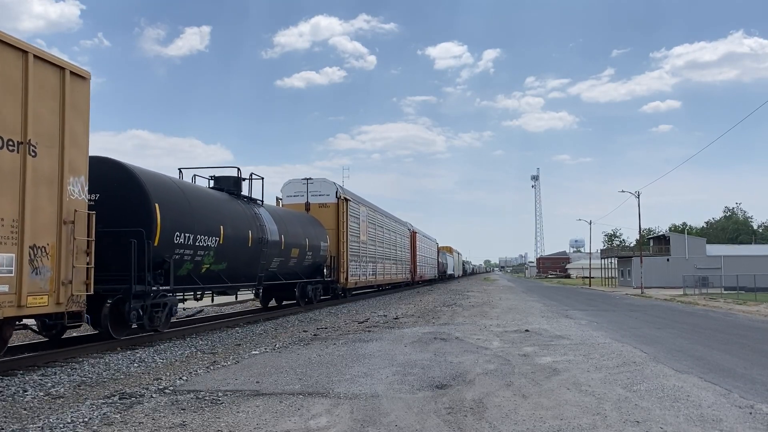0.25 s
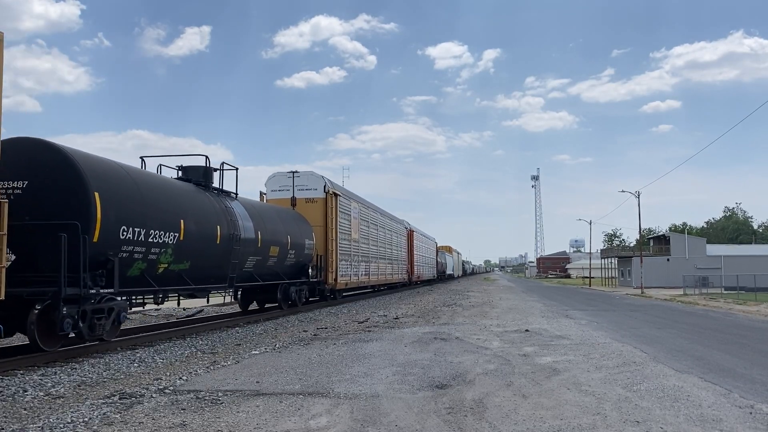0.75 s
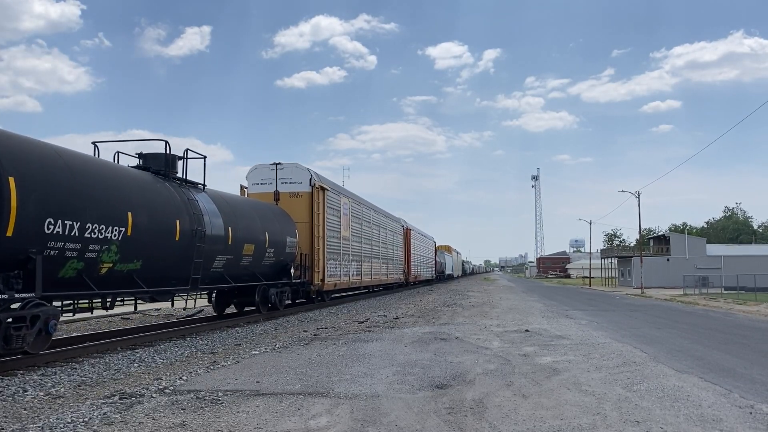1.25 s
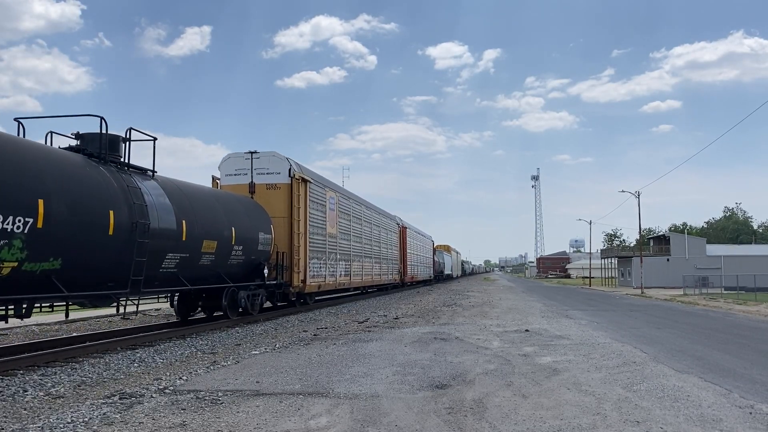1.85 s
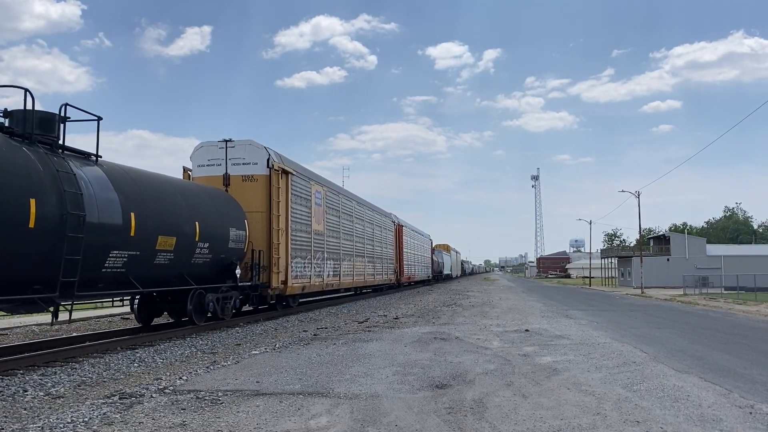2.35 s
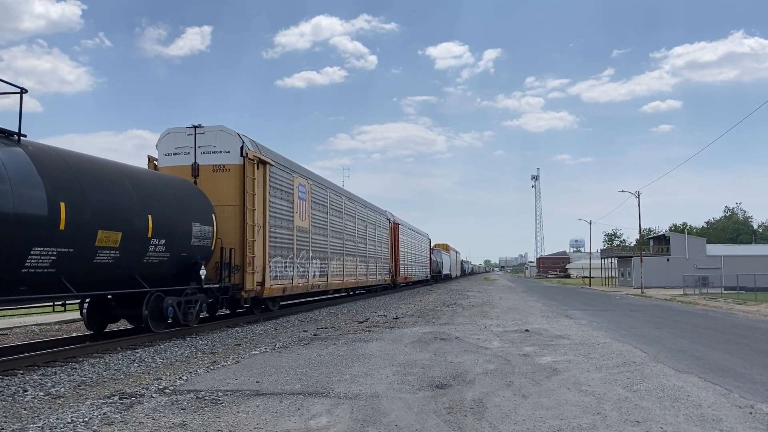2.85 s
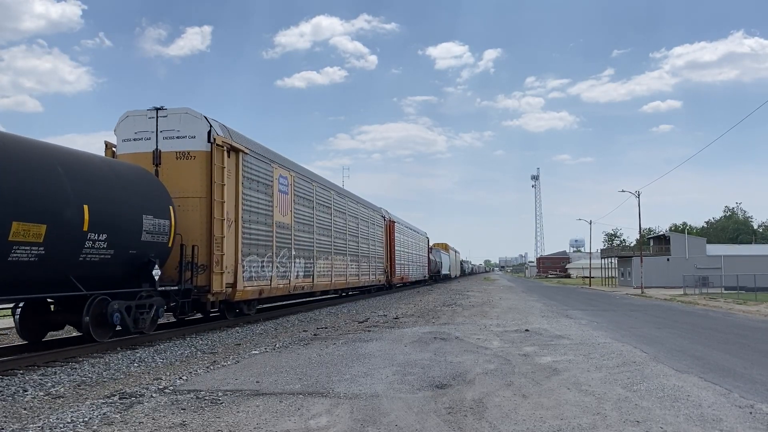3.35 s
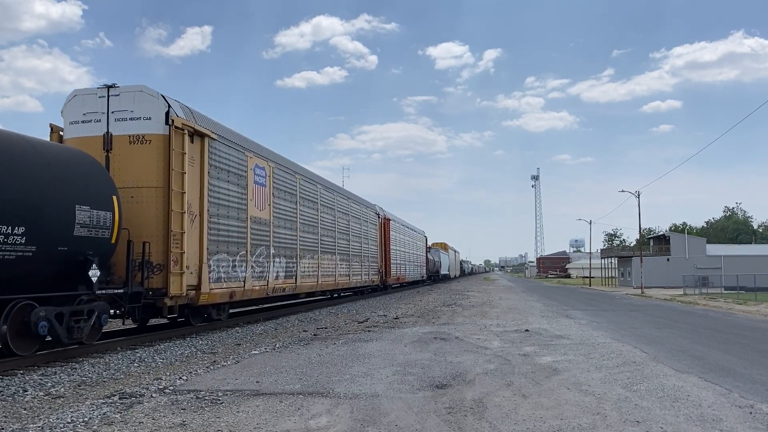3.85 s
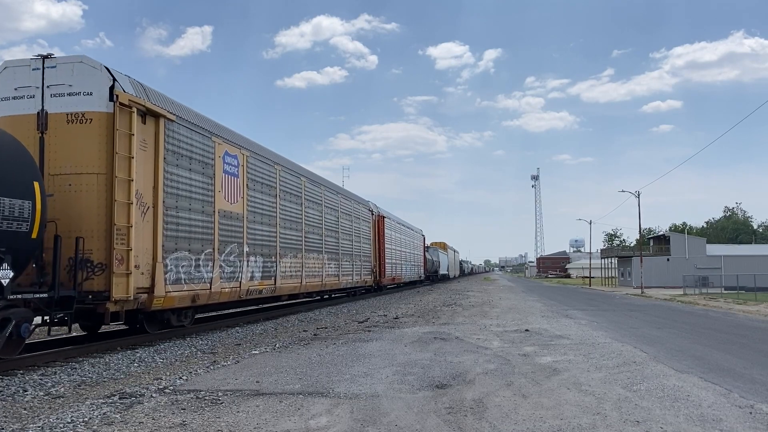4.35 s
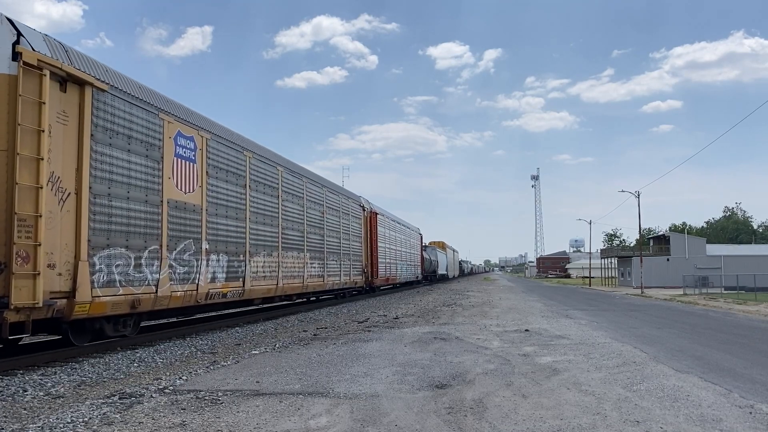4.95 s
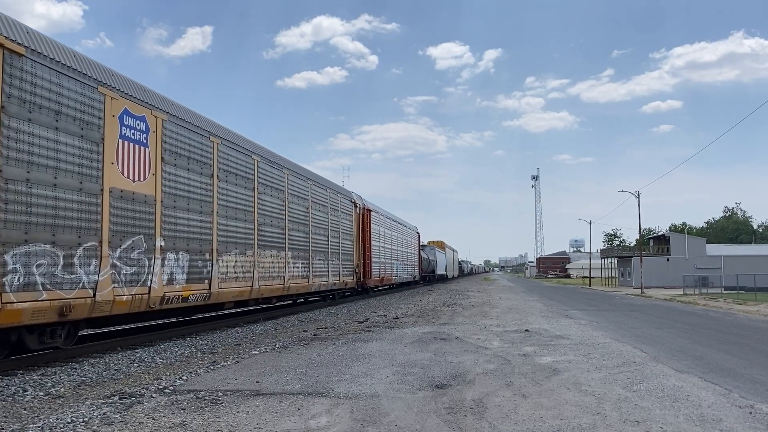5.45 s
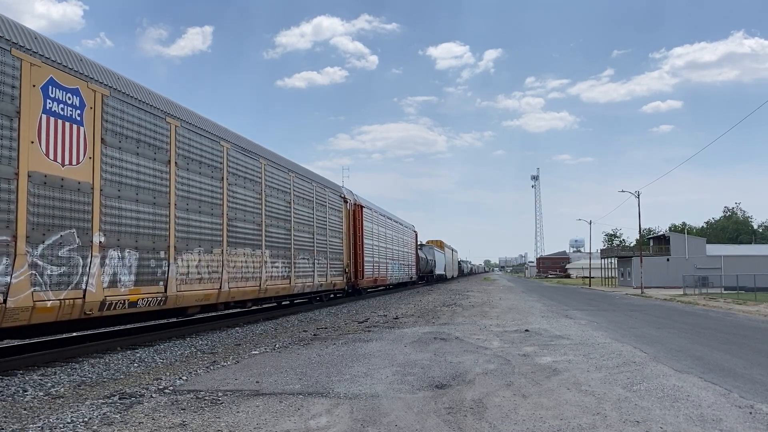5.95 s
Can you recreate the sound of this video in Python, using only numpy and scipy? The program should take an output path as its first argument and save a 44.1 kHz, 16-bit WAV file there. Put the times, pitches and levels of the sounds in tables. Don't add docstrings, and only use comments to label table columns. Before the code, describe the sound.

Outdoor trackside stereo from a handheld phone, unprotected from wind. Heavy cars heave with low rumble while wheels hiss, ring and clatter a few steps away. Loose steel ticks and rattles; flanges rub in bright bursts. After a tiny high ping comes a violent low gust thump, then stronger rubbing, a singing wheel truck, squeaks and several softer wind slaps. Each passing truck shifts the tone and side.

```python
import sys
import numpy as np
from scipy import signal
from scipy.fft import rfft, irfft, next_fast_len
from scipy.io import wavfile
from scipy.ndimage import uniform_filter1d

SR = 44100
rng = np.random.default_rng(int(sys.argv[2]) if len(sys.argv) > 2 else 0)


def gain_from_db(level_db):
    decades = np.asarray(level_db, float) / 20
    return 10 ** decades


def log_audio(samples):
    frames = np.atleast_2d(samples).T
    limited = np.clip(frames, -1, 1)
    pcm = np.round(limited * 32767).astype(np.int16)
    wavfile.write(sys.argv[1], SR, pcm)


N = 273420
M = next_fast_len(N)
T, HZ = np.arange(N) / SR, np.fft.rfftfreq(M, 1 / SR)
OCTAVE = np.log2(HZ + 1)
CONTROL = 32


def shape(table):
    hz, value = np.transpose(table)
    return np.interp(np.log(HZ + 1), np.log(hz + 1), value)


def curve(table):
    return np.interp(T, *np.transpose(table))


def fine(slow):
    return np.repeat(slow, CONTROL)[:N]


def bumps(table):
    t = T[::CONTROL]
    return fine(sum(db * np.exp(-((t - s) / half_s) ** 2) for s, db, half_s in table))


def unit(x):
    return x / np.sqrt(np.mean(x ** 2))


def walk(rate):
    k = int(SR / CONTROL / rate)
    held = np.repeat(rng.standard_normal(N // 200), k)[:N // CONTROL + 1]
    return unit(uniform_filter1d(uniform_filter1d(held, k), k))


def grains(spread_db, share):
    size_db = spread_db * np.minimum(rng.exponential(size=(2, M)), 4)
    clicks = rng.standard_normal((2, M)) * (rng.random((2, M)) < .03) * gain_from_db(size_db)
    return rfft(rng.standard_normal((2, M)) + share * unit(clicks))


def texture(table, drive, all_db, own_db, rate):
    spectrum, together, out = drive * gain_from_db(shape(table)), walk(rate), 0
    for centre in np.arange(np.log2(table[0][0]), np.log2(table[-1][0]), .5):
        band = np.cos(np.pi * np.clip(OCTAVE - centre, -.5, .5)) ** 2
        flutter_db = all_db * together + own_db * walk(rate * 1.5)
        out = out + irfft(spectrum * band, M)[:, :N] * fine(gain_from_db(flutter_db))
    return unit(out)


def ring(drive, hz, width):
    return unit(irfft(drive / (1 + ((HZ - hz) / width * 2) ** 2), M)[..., :N])


def burst(t0, rise, t60, clock=T):
    t = np.clip(clock - t0, 0, None)
    return (1 - np.exp(-t / rise)) * np.exp(-np.log(1000) * t / t60)


def swells(table):
    out = np.zeros((2, N))
    for t0, db, hz, half_s in table:
        i = slice(max(int((t0 - 3 * half_s) * SR), 0), int((t0 + 3 * half_s) * SR))
        turn = 2 * np.pi * hz * (T[i] - t0)
        swell = gain_from_db(db) * np.exp(-((T[i] - t0) / half_s) ** 2)
        out[:, i] += swell * np.array([np.cos(turn), 0.36 * np.sin(turn)])
    return out


def rumble():
    # start_s, level_db
    weight = [(0, -17.5), (.4, -21.5), (1, -20.5), (1.6, -21.5), (2.4, -23), (2.95, -18), (3.3, -17),
              (3.6, -24.5), (4, -19.5), (4.6, -18.5), (5.2, -18.5), (5.6, -17.5), (6.2, -20.5)]
    # centre_s, change_db, half_length_s
    heaves = [(.03, 6, 0.019), (.41, -7, 0.022), (.53, 2.5, 0.048), (1.93, 8.5, 0.087), (2.05, -1, .03),
              (2.87, 3.5, 0.024), (3.03, 7, 0.02), (2.31, -14, 0.026), (2.37, 3, .03), (2.52, -4, .04),
              (2.97, 11.5, 0.048), (3.12, -6.5, 0.12), (3.26, -1, 0.038), (3.49, 0, 0.022),
              (3.95, 3.5, 0.059), (4.02, -18, 0.025), (4.09, 4.5, 0.024), (4.21, 4, 0.018),
              (4.38, -0.5, 0.044), (4.44, -6, 0.027), (4.66, 0, 0.045), (4.8, 2, 0.02), (4.9, -4, 0.043),
              (5.2, 5.5, 0.099), (5.46, 4.5, 0.024), (5.58, -11, 0.037), (5.87, -6, 0.033)]
    # frequency_hz, density_db
    spectrum = [(20, -15), (32, -29), (45, -7.5), (62, -0.5), (85, 0.5), (115, -5.5), (160, -11.5),
                (300, -44)]
    # centre_s, peak_db, pitch_hz, half_length_s
    surges = [(0.053, -12, 84, 0.0093), (0.14, -17, 78.6, 0.01), (0.523, -15.5, 84, 0.019),
              (0.633, -14.5, 79.5, 0.014), (0.715, -12.5, 80.5, 0.015), (0.849, -12.5, 76, 0.011),
              (0.912, -17.5, 74.4, 0.015), (1.002, -15, 89, 0.019), (1.215, -15, 77, 0.0076),
              (1.447, -9, 82, 0.007), (1.876, -15, 79, 0.013), (1.927, -11, 70.4, 0.021),
              (2.11, -18, 74, 0.018), (2.239, -13, 77, 0.0073), (2.36, -11, 86, 0.014),
              (2.569, -12.5, 91, 0.014), (2.618, -10, 84, 0.0093), (2.693, -10.5, 77, 0.015),
              (2.777, -16, 92, 0.02), (2.914, -6.5, 91, 0.012), (2.988, -13, 89, 0.0096),
              (3.032, -9, 68.6, 0.019), (3.094, -10, 89, 0.0094), (3.249, -12.5, 79, 0.01),
              (3.334, -12, 85, 0.0074), (3.489, -17, 84, 0.019), (3.935, -10, 81, 0.028),
              (4.086, -12.5, 85, 0.019), (4.147, -9, 86, 0.0069), (4.225, -11, 82.4, 0.027),
              (4.317, -12.5, 88, 0.018), (4.403, -10, 79, 0.007), (4.54, -14.5, 83, 0.026),
              (4.596, -13, 78.5, 0.013), (4.659, -15, 84.5, 0.03), (4.732, -11.5, 91, 0.022),
              (4.809, -4, 99, 0.013), (5.001, -11.5, 90, 0.017), (5.073, -7, 82.6, 0.019),
              (5.131, -8.3, 85, 0.016), (5.205, -6, 78, 0.011), (5.257, -9.5, 77, 0.014),
              (5.464, -9, 85.5, 0.013), (5.57, -9, 78.4, 0.0074), (5.641, -13, 80, 0.012),
              (5.756, -8, 77, 0.0077), (5.917, -9, 80, 0.0059), (5.965, -17.5, 78, 0.012),
              (6.025, -15, 72, 0.015), (6.143, -11.5, 89, 0.011)]
    level_db = curve(weight) + 0.66 * bumps(heaves) - 1
    return gain_from_db(level_db) * texture(spectrum, grains(4.2, 0.41), 0.92, 0.26, 7) + swells(surges)


def wheels():
    # start_s, level_db
    flange = [(0, -52), (.53, -52), (.62, -44.5), (1.0, -36.5), (1.44, -37.5), (1.5, -44.5), (1.72, -54),
              (2.0, -45.5), (2.35, -54), (2.75, -45.5), (3.4, -52), (3.72, -47), (3.8, -36), (4.45, -37),
              (4.95, -39.5), (5.56, -42.5), (5.72, -48.5), (6.2, -53)]
    # centre_s, change_db, half_length_s
    scrapes = [(.08, 4, 0.016), (.38, 7.5, 0.018), (1.24, -2, 0.018), (1.6, 0.5, 0.015), (1.79, 3.5, .03),
               (1.97, 2.5, 0.019), (2.15, 3, 0.02), (2.47, 6.5, 0.029), (2.68, 3, 0.018),
               (2.98, -3.5, 0.074), (3.13, 3, 0.077), (3.28, 3, 0.077), (3.66, -1, .02), (3.82, 0.5, 0.028),
               (4.03, -4.5, 0.047), (4.14, 2.5, 0.012), (4.37, 3, 0.024), (4.99, -5.5, 0.032),
               (5.2, 2, 0.1), (5.37, -7, 0.0098), (5.82, 5.5, 0.015), (5.9, 5.5, 0.019), (6.17, -2, 0.018)]
    flange_db, scrape_db = curve(flange), bumps(scrapes)
    press_db = flange_db + 50
    rough = grains(3.6, 0.63)
    out = rolling(rough, press_db, scrape_db) + car_sides(rough, press_db)
    return out + rubbing(flange_db + scrape_db)


def rolling(rough, press_db, scrape_db):
    # start_s, level_db
    tread = [(0, 2), (.5, 2.5), (1.1, -2.5), (1.5, -0.5), (2.4, -3), (3.5, 0.5), (4.1, 1), (4.45, 8),
             (4.8, 1), (5.25, 5.5), (5.6, -2), (6.2, -1)]
    # frequency_hz, density_db
    spectrum = [(1100, -11), (1600, 1.5), (2000, -1), (2500, 2), (3100, -3), (4500, -8.5), (7000, -24.5)]
    # pitch_hz, width_hz, level_db
    modes = [(1040, 11, 4), (1348, 40, 7.5), (1760, 4.9, 5), (1925, 63, 7.5), (2250, 30, 3.5),
             (2586, 22, 3.5)]
    roll = texture(spectrum, rough, 0.55, 2.9, 8.2)
    for hz, width, db in modes:
        roll += ring(rough, hz, width) * fine(gain_from_db(db - 27 + 2 * walk(13)))
    return gain_from_db(-43.5 + 0.31 * press_db + 0.28 * scrape_db + curve(tread)) * roll


def car_sides(rough, press_db):
    # centre_s, change_db, half_length_s
    knocks = [(.33, -4, 0.024), (.45, 3, 0.028), (1.43, 9.5, 0.0065), (1.59, -2, 0.027), (1.67, -3, 0.027),
              (1.83, 12, 0.027), (1.97, 5, 0.07), (2.07, 4.5, 0.034), (2.48, 4, .02), (2.957, 7, .005),
              (3.0, 8.5, 0.05), (3.045, 9, 0.008), (3.32, -6, 0.055), (3.76, -12, 0.024), (3.9, 4, 0.085),
              (4.14, 8, 0.015), (4.755, -3, 0.0062), (4.93, -5, .05), (5.12, 3, .02), (5.4, -3, .03),
              (5.9, 5, 0.018)]
    # frequency_hz, density_db
    spectrum = [(450, -53), (700, 0.5), (1000, 4), (1350, -3), (1900, -20.5)]
    drum = texture(spectrum, rough, 0.55, 0.8, 12)
    return gain_from_db(-43.5 + 0.41 * press_db + bumps(knocks)) * drum


def rubbing(rub_db):
    # frequency_hz, density_db
    spectrum = [(1200, -2.5), (2200, -3), (3300, -0.5), (3750, -0.5), (4200, -1), (5500, -4), (7000, -5.5),
                (8800, -8.5), (12000, -16), (14000, -19.5), (15000, -26), (15250, -110)]
    # start_s, peak_db, t60_s
    clacks = [(0.0543, -43, 0.15), (0.1166, -48, 0.22), (0.251, -35.5, 0.084), (0.3456, -42, 0.12),
              (0.4723, -56, 0.085), (1.2755, -30, 0.046), (1.4137, -33.5, 0.12), (1.6028, -34, 0.057),
              (1.6921, -36.5, 0.072), (1.8582, -39, 0.041), (1.937, -44, 0.14), (2.2358, -49, 0.12),
              (3.217, -30.5, 0.047), (3.268, -42.5, 0.43), (3.7135, -35, 0.066), (4.063, -23, 0.037),
              (5.018, -44, 0.13), (5.7853, -34.5, 0.08), (5.8656, -37, 0.088), (5.966, -34, 0.085),
              (6.155, -36, 0.095)]
    rub = texture(spectrum, grains(3.4, 0.35), 1.34, 0.87, 11) + rattles()
    clack = fine(sum(gain_from_db(db + 0.5) * burst(t0, .003, t60, T[::CONTROL]) for t0, db, t60 in clacks))
    return (gain_from_db(rub_db + 4.5) + clack) * rub


def rattles():
    out, t = np.zeros(N), T[:5000]
    for when, pitch, size, life in rng.random((700, 4)):
        i, hz = int(when * (N - len(t))), 1200 * 7 ** pitch
        fall = burst(0, .004, .08 + .14 * life, t)
        out[i:i + len(t)] += gain_from_db(-7.5 - 6 * pitch + 6 * size) * fall * np.sin(2 * np.pi * hz * t)
    return np.array([out, 0 * out])


def gliding_bands():
    # start_s, length_s, from_hz, to_hz, level_db
    glides = [(.5, 0.75, 2500, 1700, -43), (5, 0.29, 2200, 2000, -49), (4.5, 0.38, 2750, 2400, -39.5),
              (0.3, .5, 2350, 2250, -46)]
    width_hz = 170
    grain = ring(grains(3.1, 0.45), 1, width_hz) * fine(gain_from_db(2 * walk(14)))
    out = 0
    for t0, length, start_hz, end_hz, db in glides:
        gone = np.clip((T - t0) / length, 0, 1)
        turns = np.cumsum(start_hz + (end_hz - start_hz) * gone) / SR
        out = out + gain_from_db(db) * np.sqrt(np.sin(np.pi * gone).clip(0)) * np.sin(2 * np.pi * turns)
    return grain * out


def squeaks():
    # start_s, length_s, pitch_hz, level_db, left_lead_rad
    cries = [(0.49, 0.038, 1856, -38.5, 1.1), (0.99, 0.058, 1303, -40, 1.1), (1.2, 0.27, 1257, -45, 1.2),
             (1.808, 0.025, 1335, -31.5, 1.5), (1.955, 0.038, 1300, -33, 1.1), (2.75, 0.18, 1314, -48, 1.5),
             (2.893, 0.083, 1720, -31.5, 1.8), (2.96, .04, 1720, -38, 1.9), (3.17, 0.05, 2730, -41, 0.91),
             (3.217, 0.24, 1297, -45, 0.92), (1.345, 0.058, 3390, -37, 1.2), (3.84, 0.18, 1860, -39.5, 1.1),
             (4.266, 0.024, 686, -31, 2), (4.695, 0.5, 3662, -49, 0.3), (5.843, 0.28, 1660, -46.5, 2.2),
             (.89, 0.075, 1956, -39.5, 1.2), (.97, .09, 1960, -38, 1.2), (1.0, .06, 1690, -41, 1.2),
             (0.334, 0.076, 2250, -50, .8), (1.27, 0.061, 1760, -42, 1.2), (4.354, .1, 2205, -37.5, .1),
             (4.593, .08, 2520, -35.5, .3), (5.2, 0.13, 1864, -38, 1.2)]
    out, waver = np.zeros((2, N)), np.cumsum(1 + 0.0052 * fine(walk(60))) / SR
    sides = gain_from_db([[3], [-3]])
    for t0, length, hz, db, lead in cries:
        i = slice(int(t0 * SR), int((t0 + length) * SR))
        swell = fine(gain_from_db(db + 4 * walk(60)))[i] * np.sin(np.pi * (T[i] - t0) / length)
        out[:, i] += swell * np.sin(2 * np.pi * hz * waver[i] - np.array([[0], [lead]])) * sides
    return out


def loose_rings():
    # centre_s, pitch_hz, peak_db
    tones = [(0.372, 4371, -47), (0.372, 4860, -55.7), (0.372, 5577, -53), (0.627, 5340, -54.9),
             (0.697, 5100, -43), (1.603, 4450, -48), (1.95, 3870, -48), (1.95, 5900, -53),
             (2.252, 3252, -50.5), (2.461, 3940, -53.9), (2.461, 5233, -59.8), (2.694, 2390, -45),
             (2.694, 4250, -56), (2.763, 1970, -46), (2.879, 3820, -51.5), (3.088, 3450, -48),
             (3.297, 4350, -57), (3.785, 3900, -50.9), (3.808, 2180, -41.5), (3.808, 2440, -41.5),
             (3.854, 5540, -40.5), (3.878, 4673, -43), (4.203, 2330, -38), (4.737, 4020, -38),
             (5.828, 2230, -45), (5.828, 3639, -46), (5.898, 5340, -53), (5.968, 3660, -51.7),
             (5.992, 3900, -45), (6.153, 5254, -50.0)]
    half_s = 0.022
    return swells([(s, db + 4, hz, half_s) for s, hz, db in tones])


def ping():
    # pitch_hz, width_hz, level_db, t60_s
    modes = [(12950, 600, -48, 0.7), (7600, 300, -54, 0.68), (10300, 900, -48, .08), (14300, 400, -56, .3),
             (15300, 600, -61, .45), (13000, 8000, -35, .012)]
    start_s, rise_s = 2.236, .0004
    shiver, out = rfft(rng.standard_normal(M)), 0
    for hz, width, db, t60 in modes:
        out = out + gain_from_db(db) * burst(start_s, rise_s, t60) * ring(shiver, hz, width)
    return np.array([out, 0 * out])


def slaps():
    # start_s, peak_db, thump_hz, t60_s
    gusts = [(2.867, -11, 187, 0.052), (2.956, 1, 182, 0.12), (3.02, -8.5, 171, 0.23),
             (3.04, -6.5, 263, 0.055), (3.239, -11, 198, 0.062), (4.713, -15, 196, 0.086),
             (4.75, -5.5, 281, 0.069), (5.445, -1.5, 208, 0.085), (5.646, -4.5, 201, 0.052),
             (4.8, -5, 170, 0.066), (5.012, -9.5, 191, .08)]
    rise_s, sink_s, start_pitch = .003, .012, 2.05
    band = signal.butter(3, [250, 520], "band", fs=SR, output="sos")
    air = signal.sosfilt(band, rng.standard_normal((2, N)))
    air = air[0] + 0.15 * air[1] * np.array([[1], [-1]])
    out = np.zeros((2, N))
    for t0, db, hz, t60 in gusts:
        i = slice(int(t0 * SR), int((t0 + 0.16) * SR))
        turns = hz * sink_s * np.log1p((T[i] - t0) / sink_s) * start_pitch
        thump = np.sin(2 * np.pi * turns) * burst(t0, rise_s, t60, T[i])
        puff = gain_from_db(-10) * (hz / 200) ** 2 * unit(air[:, i]) * burst(t0, 0.0033, 0.96 * t60, T[i])
        out[:, i] += gain_from_db(db - 6) * (thump + puff)
    return out


def wind():
    # start_s, strength_db
    strength = [(0, -26.5), (.9, -27), (1.05, -23), (1.3, -26.5), (1.7, -27.5), (2.3, -28), (2.45, -28),
                (2.6, -25), (2.93, -25.5), (2.96, -11), (3.045, -19), (3.06, -25), (3.32, -27), (3.57, -29),
                (3.85, -26), (4.7, -24.5), (5.5, -26), (6.2, -26.5)]
    # frequency_hz, density_db
    spectrum = [(80, -25), (130, -2.5), (200, -2.5), (300, -7.5), (450, -10.5), (650, -16.5), (950, -27.5),
                (1500, -57)]
    # centre_s, peak_db, pitch_hz, half_length_s
    eddies = [(0.079, -17, 176, 0.0091), (0.562, -15.5, 190, 0.0055), (0.816, -23, 184, 0.0074),
              (1.042, -14, 181, 0.01), (1.095, -20, 203, 0.008), (1.178, -16, 209, 0.014),
              (1.295, -23, 216, 0.0094), (1.408, -22, 157, 0.013), (1.518, -23, 197, 0.0053),
              (1.574, -17.5, 191, 0.011), (1.698, -29, 194, 0.008), (1.796, -20, 178, 0.0072),
              (1.863, -15.5, 204, 0.0084), (2.06, -19, 222, 0.0092), (2.259, -19, 178, 0.0066),
              (2.592, -19.5, 202, 0.0074), (2.83, -17.5, 215, 0.0092), (2.874, -15, 199, 0.0091),
              (2.974, -4, 184, 0.0079), (3.025, -7.5, 171, 0.0075), (3.118, -17.5, 193, 0.018),
              (3.244, -17, 197, 0.012), (3.289, -15, 202, 0.012), (3.327, -13.5, 168, 0.022),
              (3.525, -20, 177, 0.016), (3.816, -16, 180, 0.0091), (3.874, -13.5, 176, 0.012),
              (3.988, -18.5, 180, 0.023), (4.089, -18, 169, 0.008), (4.21, -10.5, 172, 0.0082),
              (4.372, -20, 187, 0.0067), (4.571, -16.5, 155, 0.014), (4.62, -9, 153, 0.011),
              (4.72, -18.5, 191, 0.016), (4.766, -12, 250, 0.0079), (4.931, -17, 186, 0.018),
              (4.979, -17, 225, 0.0067), (5.102, -18.5, 181, 0.0073), (5.179, -14, 223, 0.0074),
              (5.209, -19, 214, 0.0099), (5.327, -18, 173, 0.0086), (5.36, -24, 178, 0.008),
              (5.451, -12, 200, 0.0127), (5.511, -12.5, 172, 0.0086), (5.657, -10, 198, 0.0072),
              (5.752, -10.5, 204, 0.0053), (5.834, -11.5, 176, 0.0086), (5.973, -14, 169, 0.0095),
              (6.028, -15, 183, 0.006), (6.151, -18, 212, 0.0086)]
    # centre_s, peak_db, pitch_hz
    small_eddies = [(0.493, -23, 417), (1.064, -21.5, 421), (1.157, -24.5, 395), (1.539, -19.5, 424),
                    (1.822, -23.5, 446), (2.276, -27, 400), (2.958, -17, 467), (2.968, -18, 640),
                    (2.986, -16, 500), (3.0, -28, 595), (3.011, -16, 485), (3.036, -19, 388),
                    (3.046, -18, 646), (5.48, -21.5, 590), (3.167, -28, 450), (3.457, -27, 390),
                    (4.149, -26, 416), (4.193, -21, 514), (4.276, -19.5, 562), (4.756, -21, 500),
                    (4.801, -23, 463), (4.92, -27, 409), (4.976, -26, 410), (4.855, -25, 440),
                    (5.12, -24, 650), (5.23, -21, 498), (5.397, -24, 411), (5.449, -19, 440),
                    (5.653, -20.5, 394), (5.748, -21.5, 400)]
    small_half_s = 0.007
    shed = [*eddies, *[(*row, small_half_s) for row in small_eddies]]
    buffet = texture(spectrum, grains(4.1, 0.56), 0.93, 1.48, 14)
    return gain_from_db(curve(strength) + 0.47) * buffet + gain_from_db(-2.5) * swells(shed)


def scene():
    # frequency_hz, share_0_to_1
    likeness = [(30, 0.77), (60, 0.71), (200, 0.54), (450, 0.76), (1000, 0.69), (2200, 0.64), (3200, 0.35),
                (4500, 0.43), (5600, 0.3), (7000, 0.81), (8500, 1), (14000, 0.53)]
    # frequency_hz, lead_rad
    leads = [
        [(0, 0), (900, 3.1), (1300, 2.4), (1800, 1.2), (2500, 1.2), (3100, 4.4), (4000, 5.2), (5200, 4.6),
         (6300, 6.3), (16000, 16.7)],
        [(0, 0), (900, 3.0), (1400, 2.5), (2100, 0), (2800, -.2), (3500, .6), (4300, .6), (4600, -1),
         (5200, -1.8), (6300, .3), (16000, 10.4)],
        [(0, 0), (1000, 3.1), (1500, 3.7), (2300, 6.3), (2900, 6.7), (3600, 10.8), (4500, 11.8), (5200, 12),
         (6100, 14), (6600, 13), (16000, 23)],
    ]
    changes = [1.44, 3.45, 5.48]
    # centre_hz, width_hz, change_db
    colours = [
        [(3680, 540, -4), (6900, 620, 3)],
        [(3660, 540, 0.5), (4550, 1000, -0.5)],
        [(3720, 520, -6), (4250, 450, 3)],
        [(2000, 430, -1), (3420, 2100, 2.5)],
    ]
    streams = rumble() + wheels() + gliding_bands() + loose_rings() + ping() + wind()
    same, other = rfft(streams, M)
    like = np.clip(shape(likeness), 0, 1)
    same, other = same * np.sqrt((1 + like) / 2), other * np.sqrt((1 - like) / 2)
    past = [np.clip((T - s) / 0.098, 0, 1) for s in changes]
    nearness = -np.diff([1 + 0 * T, *past, 0 * T], axis=0)
    out = squeaks() + slaps()
    for near, lead, dips in zip(nearness, [*leads, leads[-1]], colours):
        colour = gain_from_db(sum(db / (1 + ((HZ - hz) / width * 2) ** 2) for hz, width, db in dips))
        late = np.exp(-1j * np.interp(HZ, *np.transpose(lead)))
        ports = np.array([same + other, (same - other) * late])
        out += near * irfft(colour * ports, M)[:, :N]
    return out


def low_pass(x):
    return signal.sosfilt(signal.butter(12, 15900, fs=SR, output="sos"), x)


def record(dry):
    ceiling = 1.05
    return low_pass(ceiling * np.tanh(dry / ceiling))


dry = scene()
out = record(dry)
log_audio(out)
```